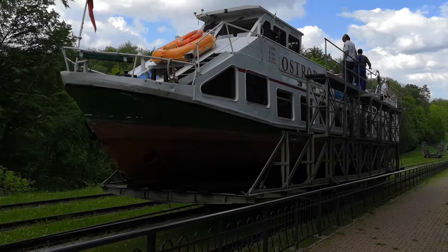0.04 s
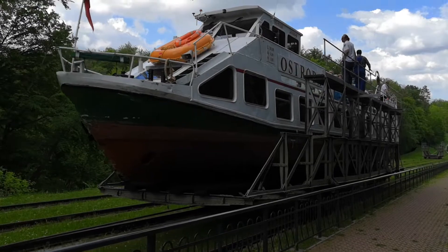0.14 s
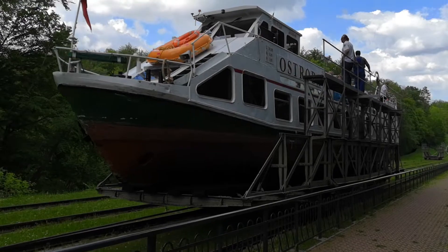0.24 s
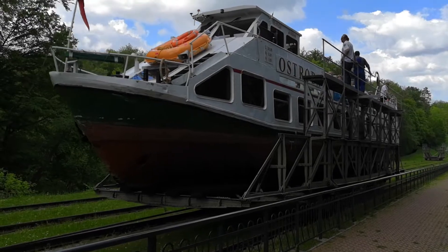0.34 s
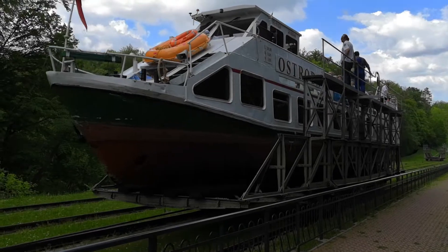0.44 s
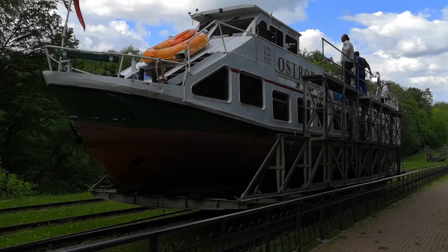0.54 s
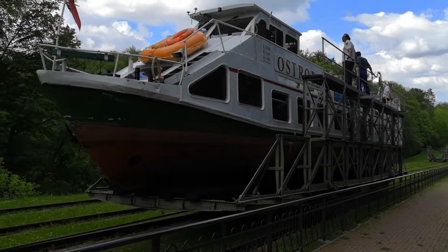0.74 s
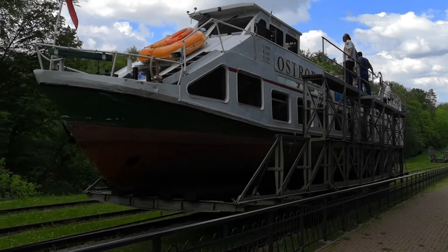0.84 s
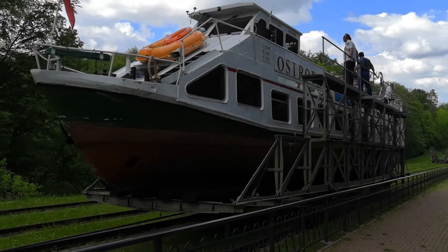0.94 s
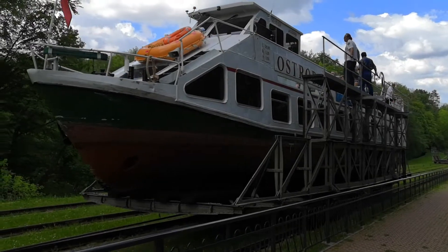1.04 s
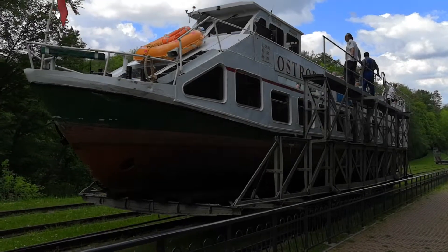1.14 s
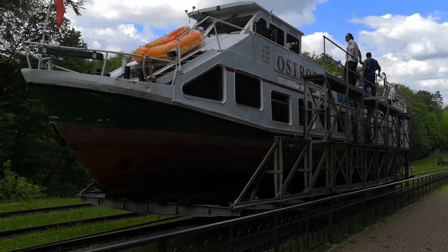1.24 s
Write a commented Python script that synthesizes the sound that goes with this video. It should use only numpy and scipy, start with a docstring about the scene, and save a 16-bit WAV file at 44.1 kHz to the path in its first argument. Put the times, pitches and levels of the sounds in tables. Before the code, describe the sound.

A heavy steel carriage clunks hard on rails at about 0.23 seconds, after a quiet low rumble. Rapid knocks, a deep frame shudder, clatter, rattle and a light wheel scrape die away by 0.65, with thin metallic ringing. Small clicks follow near 0.7 and 0.8, a soft knock at 1.0, a faint high bird chirp at 1.1 and a tiny tick at 1.28, over soft outdoor hiss.

```python
"""Outdoors, near trees: a heavy steel carriage rolls slowly on rails and jolts.
Its frame booms as ringing modes under blows, and noise bands shudder, clatter, rattle and scrape.
Thin parts sing as narrow resonances of noise, and loose parts click as cracks with short rings.
A small bird calls once, a gliding sine wave with echoes, and a short tick of treble follows.
Shaped noise makes the rolling rumble and open-air hiss underneath."""
import sys
import numpy as np
from scipy import signal
from scipy.fft import rfft, irfft, next_fast_len
from scipy.io import wavfile
from scipy.ndimage import map_coordinates

SR = 44100
rng = np.random.default_rng(int(sys.argv[2]) if len(sys.argv) > 2 else 0)


def to_wav(sig):
    """Store sig (one row per channel, or 1-D mono) as 16-bit WAV at the path in sys.argv[1].

    Samples outside -1..1 are clipped; the rate is SR.
    """
    pcm = np.clip(np.atleast_2d(sig), -1, 1) * 32767
    pcm = np.round(pcm).astype(np.int16)
    wavfile.write(sys.argv[1], SR, pcm.T)  # frames by channels


def voltage_ratio(level):
    """Linear amplitude factor for a level in decibels (scalar or array-like)."""
    return 10 ** (np.asarray(level, float) / 20)


N = 57330  # length in samples
TIME = np.arange(N) / SR  # seconds


def unit(x):
    """Scale a sound to rms 1."""
    return x / np.sqrt(np.mean(x ** 2) + 1e-20)


def along(points, hz):
    """Read a (frequency, value) table at any frequency, on a log frequency axis."""
    table_hz, values = np.transpose(points)
    return np.interp(np.log(hz + 1), np.log(table_hz + 1), values)


def curves(rows):
    """Turn each column after the time into a curve with one value per sample."""
    times, *columns = np.transpose(rows)
    return [np.interp(TIME, times, column) for column in columns]


def wobble(rate):
    """Draw a smooth random curve through `rate` random points a second."""
    return map_coordinates(rng.standard_normal(400), [TIME * rate])


def filtered(x, response):
    """Multiply the spectrum of x by a response that depends on frequency."""
    size = next_fast_len(N + SR // 2)
    hz = np.fft.rfftfreq(size, 1 / SR)
    return irfft(rfft(x, size) * response(hz), size)[..., :N]


# How alike the left and right noise are, 1 = the same: (frequency [Hz], likeness [-1 to 1])
LIKENESS = [(40, .999), (90, 0.98), (180, 1), (350, 0.25), (700, 0.024), (1400, 0.065), (2800, 0.086),
            (6000, 0.036)]


def rush(spectrum, grit_db=0.):
    """Stereo noise of rms 1 with a given spectrum; fast random level changes make it gritty."""
    pair = rng.standard_normal((2, N)) * voltage_ratio(grit_db * wobble(250))

    def middle_and_side(hz):
        angle = np.arccos(np.clip(along(LIKENESS, hz), -1, 1)) / 2
        return voltage_ratio(along(spectrum, hz)) * [np.cos(angle), np.sin(angle)]

    mid, side = filtered(pair, middle_and_side)
    return unit(np.array([mid + side, mid - side]))


def echoes(x, t60):
    """Many blended echoes: a fading noise tail, different left and right; t60 [s] is its 60 dB fade."""
    t = TIME[:SR // 2]
    tail = rng.standard_normal((2, len(t))) * voltage_ratio(-60 * t / t60)
    tail = tail / np.linalg.norm(tail[0])
    return signal.fftconvolve(x[None], tail, axes=1)[:, :N]


# Rumble strength over time, before the boost and lumps: (time [s], level [dB])
ROLLING_LEVEL = [(0, -50.5), (.1, -55), (.2, -56), (.8, -58), (.93, -58.5), (1.03, -56.5), (1.17, -59),
                 (1.3, -57.5)]
# Tone of the rolling rumble: (frequency [Hz], relative level [dB per Hz])
RUMBLE_SPECTRUM = [(18, -31), (30, 0), (47, 4), (70, -4.5), (129, -6.5), (151, -15.5), (257, -19),
                   (350, -52.5), (460, -50), (770, -120)]
# Tone of the open-air hiss: (frequency [Hz], relative level [dB per Hz])
AIR_SPECTRUM = [(180, -6), (300, -3.5), (354, -5), (431, -6), (696, -11), (936, -6.5), (1160, -9.5),
                (1590, -7), (2140, -6), (2520, -10.5), (2830, -10.5), (4410, -19), (15500, -39.5)]


def background():
    """Rolling makes low noise that swells in lumps; open air adds a gently wavering hiss."""
    rolling_db, = curves(ROLLING_LEVEL)
    rumble = voltage_ratio(rolling_db + 4.5 + 1.1 * wobble(5.1)) * rush(RUMBLE_SPECTRUM)
    left_right_db = np.array([[-.9], [.9]])
    hiss = voltage_ratio(-60.5 + 1.65 * wobble(4.13) + left_right_db) * rush(AIR_SPECTRUM)
    return rumble + hiss


# The jolt dying away: (time [s], clatter level [dB], rattle level [dB], scrape level [dB])
JOLT_LEVELS = [(.215, -69, -81, -88), (.227, -43.5, -48.5, -71.5), (.238, -30, -39, -65),
               (.254, -34.5, -40.5, -58.5), (.28, -38, -44, -58), (.31, -44, -45, -56.5),
               (.35, -39, -43.5, -50), (.385, -44.5, -51, -53), (.41, -43.5, -44, -51.5),
               (.49, -45.5, -47.5, -54), (.515, -47.5, -51, -54), (.558, -51, -54, -65),
               (.605, -52, -50.5, -61.5), (.635, -55, -58, -68.5), (.67, -62, -73, -75),
               (.73, -60.5, -65, -81), (.79, -67.5, -100, -87), (.9, -67.5, -77, -100),
               (.97, -77, -71, -96), (1.01, -67, -65, -83), (1.04, -84, -70, -83), (1.08, -90, -78, -85)]
# The frame's shudder dying away: (time [s], level [dB])
SHUDDER_LEVEL = [(.22, -70), (.26, -41), (.31, -37), (.37, -36), (.42, -37), (.49, -39), (.51, -45),
                 (.6, -45), (.66, -56), (.75, -55), (.88, -70)]
# Tone of the shuddering frame: (frequency [Hz], relative level [dB per Hz])
SHUDDER_SPECTRUM = [(18, -36), (30, -1), (113, 1), (135, -9), (166, -1), (188, -4), (220, -1.5),
                    (343, -15.5), (450, -21.5), (580, -27), (990, -120)]
# Tone of the clattering steel: (frequency [Hz], relative level [dB per Hz])
CLATTER_SPECTRUM = [(220, -12.5), (380, -3), (480, -1), (657, -9.5), (931, -5.5), (1420, -14.5),
                    (1600, -13.5), (2080, -13.5), (3520, -120)]
# Tone of the rattling steel: (frequency [Hz], relative level [dB per Hz])
RATTLE_SPECTRUM = [(820, -34), (1400, -8.5), (2020, -2.5), (2300, -3.5), (2530, -1.5), (2840, -2),
                   (3050, -6.5), (3900, -14.5), (5070, -27.5), (8580, -120)]
# Tone of the wheels scraping on the rail: (frequency [Hz], relative level [dB per Hz])
SCRAPE_SPECTRUM = [(2120, -11), (3600, -2), (4460, -2.5), (4820, 4), (6460, 0), (7760, -2.5), (9490, -11),
                   (11000, -24), (15500, -41)]


def jolt():
    """The frame shudders, loose steel clatters and rattles, and wheels scrape on the rail."""
    during = (TIME > JOLT_LEVELS[0][0]) & (TIME < JOLT_LEVELS[-1][0])
    clatter, rattle, scrape = voltage_ratio(curves(JOLT_LEVELS)) * during
    shudder = voltage_ratio(curves(SHUDDER_LEVEL)[0]) * (TIME > SHUDDER_LEVEL[0][0])
    return (shudder * rush(SHUDDER_SPECTRUM)
            + clatter * rush(CLATTER_SPECTRUM, grit_db=2.0)
            + rattle * rush(RATTLE_SPECTRUM, grit_db=2.0)
            + scrape * rush(SCRAPE_SPECTRUM, grit_db=1.0))


# How loudly the thin parts ring: (time [s], singing level [dB], squeal level [dB], whine level [dB])
SINGING_LEVELS = [(.22, -92, -105, -100), (.3, -67, -92.5, -82), (.4, -53, -65, -69.5),
                  (.46, -52, -59.5, -80), (.52, -55.5, -76, -82), (.55, -60, -74, -70),
                  (.59, -54, -67, -71), (.67, -64, -75, -75), (.70, -66.5, -88, -86),
                  (.75, -68.5, -84, -74), (.8, -66, -91, -80.5), (.83, -74.5, -88, -92),
                  (1.3, -75, -100, -79)]
# Thin steel parts that sing: (pitch [Hz], resonance width [Hz], relative level [dB])
SINGING_PARTS = [(2010, 30, -5), (2616, 55, 0), (2815, 40, 0), (5696, 40, -13)]
# Higher thin parts that squeal: (pitch [Hz], resonance width [Hz], relative level [dB])
SQUEALING_PARTS = [(7945, 15, 0), (8040, 25, -5), (9157, 40, -10)]
# The thin part that whines: (pitch [Hz], resonance width [Hz], relative level [dB])
WHINING_PART = [(4344, 15, 0)]


def singing():
    """Shaking, modelled as noise, makes thin steel parts ring at their narrow resonances."""
    def ring(parts):
        def resonances(hz):
            return sum(voltage_ratio(db) * 1j * hz * width / (pitch * pitch - hz * hz + 1j * hz * width)
                       for pitch, width, db in parts)
        shaking = rush([(100, 0.016), (9000, 0.0052)])  # almost flat noise
        return unit(filtered(shaking, resonances))

    sing, squeal, whine = voltage_ratio(curves(SINGING_LEVELS))
    return sing * ring(SINGING_PARTS) + squeal * ring(SQUEALING_PARTS) + whine * ring(WHINING_PART)


# Blows on the frame: (time [s], strength [dB], pitch that the struck spot favours [Hz])
FRAME_BLOWS = [(.2225, -33, 150), (.230, -17.5, 140), (.2531, -21, 205), (.2995, -22.5, 205),
               (.9975, -43, 110), (.2365, -25, 330), (.288, -38, 500), (.343, -34, 100), (.36, -39, 210),
               (.262, -30, 80), (.398, -33, 115), (.478, -36, 125), (.59, -42, 200), (.615, -47, 220),
               (.248, -38, 600), (.232, -46, 900), (.245, -49, 2100), (.256, -45, 1150), (.283, -53, 2050)]
# Ringing modes of the frame: (pitch [Hz], relative level [dB], time to fade by 60 dB [s])
FRAME_MODES = [(78, -3, .15), (97, -2, .15), (137, 2, .11), (168, -4, .12), (208, 1.5, .125),
               (233, -7, .12), (262, -8, .12), (318, 0, .15), (430, 0, .15), (512, 0, .15), (607, 3, .13),
               (750, 2, .1), (836, 6, .12), (958, 8, .1), (1070, 9, .15), (1200, 8, .2), (1555, 13, .2),
               (1960, 12, .2), (2083, 13, .2), (2433, 20, .15), (3031, 12, .12)]


def blows():
    """Each blow briefly pushes the frame and rings all its modes, most those near the spot's pitch."""
    favour_db_per_octave, swell_s, push_s = 16, .0025, .001
    out, t = np.zeros(N + SR), TIME[:SR // 2]
    for start, strength_db, spot_hz in FRAME_BLOWS:
        ring = np.zeros(len(t))
        for hz, mode_db, t60 in FRAME_MODES:
            octaves_away = abs(np.log2(hz / spot_hz))
            level_db = mode_db + rng.normal(0, 1.5) - favour_db_per_octave * octaves_away
            ring += voltage_ratio(level_db - 60 * t / t60) * np.sin(2 * np.pi * hz * t)
        swell = 1 - np.exp(-t / swell_s)
        out[round(start * SR):][:len(t)] += voltage_ratio(strength_db) * ring * swell
    # a push that lasts a moment softens the treble
    return filtered(out[:N], lambda hz: 1 / (1 + 1j * hz * push_s))


# Light clicks: (time [s], ring level [dB], pitch [Hz], ring time to fade by 60 dB [s],
# crack level before its tone is shaped [dB])
LIGHT_CLICKS = [(.2305, -43, 2450, .12, -46), (.2427, -40, 2500, .03, -38), (.3964, -39, 2800, .06, -37),
                (.448, -44, 2700, .03, -40), (.496, -48, 2000, .03, -46), (.572, -47, 2790, .05, -52),
                (.590, -44, 2640, .12, -50), (.346, -39, 2200, .05, -33), (.6945, -40.5, 1420, .035, -57),
                (.713, -52, 1750, .08, -58), (.801, -52, 1780, .11, -63), (1.022, -53, 2110, .09, -64)]
# Tone of the crack: (frequency [Hz], gain [dB])
CRACK_TONE = [(400, -37), (1200, 5.5), (2200, 11.5), (3500, 7), (5000, -24), (10000, -19.5), (15000, -42)]


def clicks():
    """Loose parts click: a crack of noise and a short ring of three modes."""
    crack_t60 = .022  # seconds
    rings, cracks, t = np.zeros(N + SR), np.zeros(N + SR), TIME[:SR // 5]
    for start, ring_db, hz, t60, crack_db in LIGHT_CLICKS:
        ring = sum(share * np.sin(2 * np.pi * hz * ratio * t)
                   for ratio, share in [(1, .85), (.56, .15), (1.17, .2)])
        swell = 1 - np.exp(-t / 0.0014)
        first = round(start * SR)
        rings[first:][:len(t)] += voltage_ratio(ring_db - 60 * t / t60) * ring * swell
        cracks[first:][:len(t)] += voltage_ratio(crack_db - 60 * t / crack_t60) * rng.standard_normal(len(t))
    return rings[:N] + filtered(cracks[:N], lambda hz: voltage_ratio(along(CRACK_TONE, hz)))


# How much louder the carriage is on the right than the left: (frequency [Hz], difference [dB])
RIGHT_OVER_LEFT = [(100, 0.5), (300, 2.5), (600, 3), (1200, 2.5), (2500, 5.5), (6000, 6.5), (12000, 4.5)]


def carriage():
    """All steel sounds, to the right; struck sounds also come back from hull and ground."""
    struck = blows() + clicks()
    returned = filtered(echoes(struck, t60=0.094), lambda hz: 1 / (1 + (300 / (hz + 1)) ** 2))
    steel = struck + voltage_ratio(-10.0) * returned + jolt() + singing()
    side = np.array([[-.5], [.5]])  # left, right

    def placing(hz):
        lag_s = .00008 / (1 + (300 / (hz + 1)) ** 2)  # left hears it later, less so in the bass
        return voltage_ratio(side * along(RIGHT_OVER_LEFT, hz)) * np.exp(2j * np.pi * hz * side * lag_s)

    return filtered(steel, placing)


# Bird call, before warble and left-right gains: (time [s], pitch [Hz], level [dB])
BIRD_CALL = [(1.078, 6500, -84), (1.085, 7850, -75), (1.093, 8400, -64), (1.1, 8150, -61),
             (1.107, 7880, -63), (1.119, 8020, -64), (1.132, 7750, -68), (1.135, 8400, -78),
             (1.14, 9300, -76), (1.146, 9800, -85), (1.155, 9300, -80), (1.162, 7700, -77)]


def bird():
    """One gliding whistle with a random warble, to the right, with the trees' echo."""
    hz, db = curves(BIRD_CALL)
    during = (TIME > BIRD_CALL[0][0]) & (TIME < BIRD_CALL[-1][0])
    warble_hz = 55 * wobble(220)
    phase = 2 * np.pi * np.cumsum(hz + warble_hz) / SR
    call = np.sqrt(2) * voltage_ratio(db) * during * np.sin(phase)
    left_right_db = [[-7], [3]]
    return call * voltage_ratio(left_right_db) + echoes(call, t60=.22)


def tick():
    """A short burst of noise, kept to the treble, that starts at once and fades fast."""
    start_s, level_db, t60, low_hz = 1.2755, -53, .04, 5600  # level before filtering
    t = TIME - start_s
    burst = (t > 0) * voltage_ratio(level_db - 60 * np.abs(t) / t60) * rng.standard_normal((2, N))
    return filtered(burst, lambda hz: 1 / (1 + (low_hz / (hz + 1)) ** 16) / (1 + (hz / 10500) ** 5))


def scene():
    """Everything that reaches the microphone."""
    return background() + carriage() + bird() + tick()


def band_limit(x):
    """A steep low-pass at the top of the band."""
    return signal.sosfilt(signal.butter(12, 15610, fs=SR, output="sos"), x)


def record(dry):
    """The microphone fades out the deep bass, and everything above a top frequency is cut."""
    low_hz, top_hz = 36.4, 15700
    mix = filtered(dry, lambda hz: (hz < top_hz) * (1j * hz / (low_hz + 1j * hz)) ** 2)
    return band_limit(mix)


dry = scene()
out = record(dry)
to_wav(out)
```